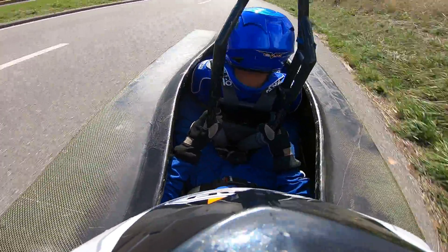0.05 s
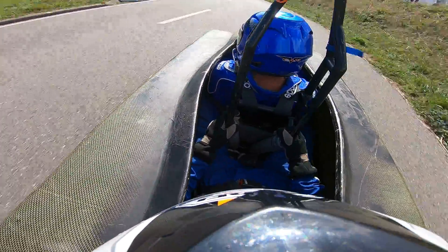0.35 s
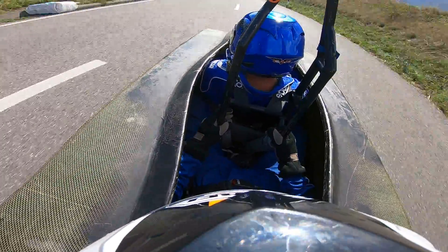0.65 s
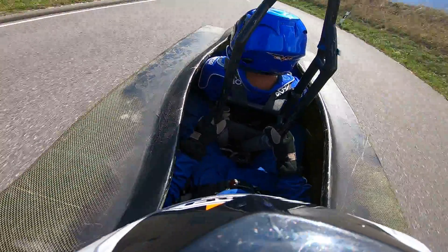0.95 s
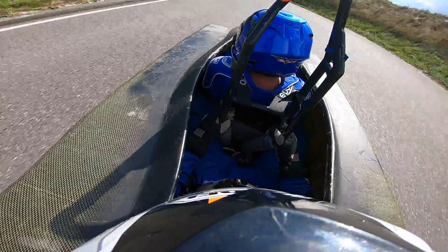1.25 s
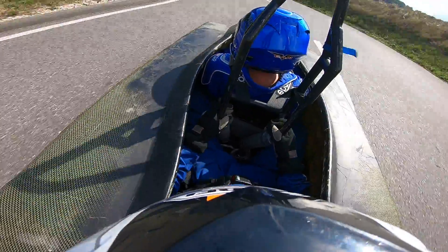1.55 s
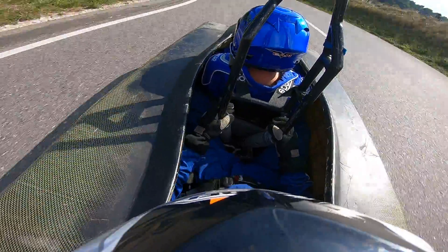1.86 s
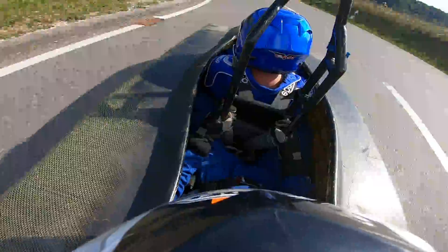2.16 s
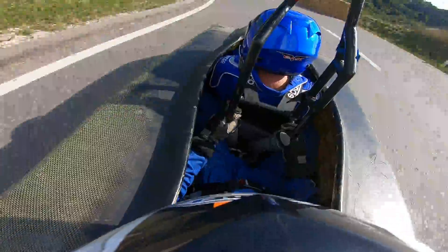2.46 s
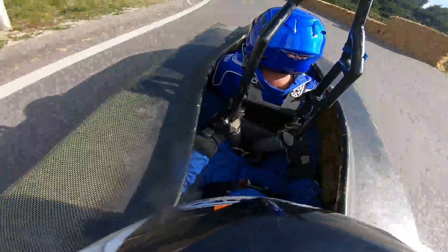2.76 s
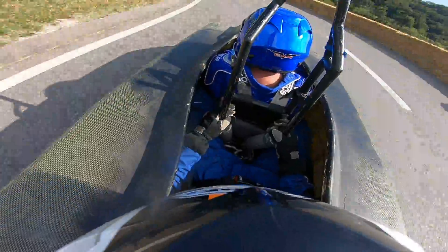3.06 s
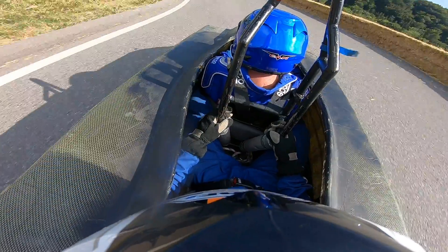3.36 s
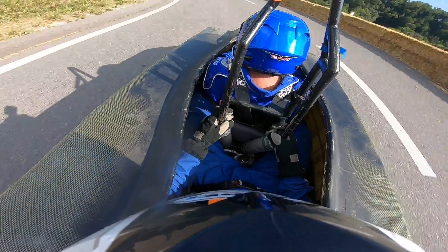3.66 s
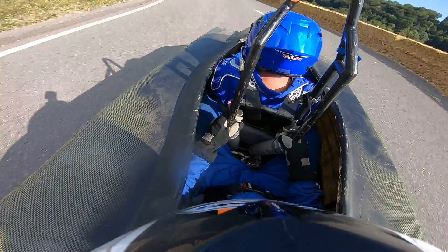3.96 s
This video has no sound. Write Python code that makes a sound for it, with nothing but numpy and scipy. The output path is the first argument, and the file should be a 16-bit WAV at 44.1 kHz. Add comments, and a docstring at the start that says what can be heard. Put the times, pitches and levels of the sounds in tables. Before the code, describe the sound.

Gusty wind buffets an onboard microphone, rushing, hissing and slapping without a break. Underneath, a soapbox's wheels rumble over rough asphalt, making its hollow shell boom, and a loose part rattles faintly and ticks on bumps.

```python
"""Wind throbs and rushes over the drumming of wheels: a soapbox rolls fast down a paved road,
heard from a camera on its shell. Turbulence buffets the microphone, tears past in short eddies,
slaps and hisses in gusts. The rough asphalt drives the resonances of the hollow body through
the wheels, and a loose part chatters throughout and knocks on the bumps."""
import sys
import numpy as np
from scipy import signal
from scipy.fft import rfft, irfft
from scipy.io import wavfile
from scipy.ndimage import uniform_filter1d, minimum_filter1d

SR = 44100
rng = np.random.default_rng(int(sys.argv[2]) if len(sys.argv) > 2 else 0)


def output_pcm(signal):
    """Save a mono or channel-first signal as 16-bit PCM at the path in sys.argv[1].

    Samples are clipped to [-1, 1] before scaling.
    """
    pcm = np.clip(np.atleast_2d(signal).T, -1, 1) * 32767
    wavfile.write(sys.argv[1], SR, np.round(pcm).astype(np.int16))


N = 176400

# Envelopes. Each row: time in seconds, relative level in dB.
BUFFET_LEVELS = [(0, -27), (.09, -16.5), (.23, -24), (.42, -17.5), (.55, -20.5), (.66, -18), (.97, -23),
                 (1.25, -23), (1.34, -15), (1.5, -18.5), (1.8, -15.5), (1.9, -20), (2.04, -29),
                 (2.2, -22.5), (3.2, -19.5), (3.3, -24), (3.45, -20.5), (3.55, -16.5), (3.81, -15),
                 (3.9, -23), (4, -18.5)]  # wind pressure on the microphone
BOOM_LEVELS = [(0, -26), (.09, -20.5), (.2, -25), (.35, -20), (.46, -31), (.64, -26), (.81, -16.5),
               (.98, -29), (1.06, -14.5), (1.14, -21.5), (1.6, -21), (1.66, -32), (1.72, -18),
               (1.83, -27.5), (2.08, -21), (2.21, -18.5), (2.42, -23), (2.65, -20), (2.93, -22),
               (3.0, -16.5), (3.15, -20.5), (3.38, -21.5), (3.5, -19), (3.86, -29), (4, -21)]  # the shell's low resonance
DRUM_LEVELS = [(0, -19), (.09, -23), (.16, -22.5), (.37, -24), (.43, -26), (.53, -20.5), (.62, -29),
               (.7, -18), (.79, -24.5), (.9, -22), (1.13, -24), (1.3, -21), (1.39, -19.5), (1.45, -23.5),
               (1.72, -21.5), (1.8, -22.5), (2.08, -22.5), (2.13, -21), (2.21, -17.5), (2.39, -23.5),
               (2.47, -21), (2.95, -21), (3.09, -26), (3.16, -20), (3.4, -20.5), (3.83, -23.5),
               (3.98, -17.5)]  # the shell's higher resonance
RUSH_LEVELS = [(0, -28.5), (.12, -25.5), (.19, -25), (.33, -29.5), (.46, -25), (.55, -27.5), (.62, -28),
               (.68, -26.5), (.76, -23.5), (.84, -26.5), (.93, -29), (1.0, -28), (1.05, -27.5),
               (1.12, -22.5), (1.27, -28.5), (1.37, -24), (1.44, -29.5), (1.57, -23.5), (1.8, -27),
               (1.95, -28.5), (2.15, -25), (2.35, -27), (2.57, -25), (2.8, -25.5), (2.97, -29.5),
               (3.05, -31), (3.17, -25.5), (3.24, -29.5), (3.4, -26), (3.53, -26.5), (3.65, -27),
               (3.68, -24), (3.8, -25.5), (4, -26)]  # air tearing past
GUST_LEVELS = [(0, -46.5), (.08, -43.5), (.14, -48), (.19, -43), (.26, -42.5), (.3, -39), (.5, -39),
               (.66, -40), (.74, -46.5), (.84, -44), (.92, -37.5), (1.02, -40), (1.045, -51), (1.08, -42),
               (1.24, -40.5), (1.285, -35), (1.315, -48), (1.35, -37.5), (1.44, -37.5), (1.53, -35.5),
               (1.58, -38.5), (1.645, -46), (1.68, -40), (1.82, -37.5), (1.87, -36), (1.93, -40.5),
               (2.13, -38), (2.22, -45), (2.31, -36), (2.37, -38), (2.44, -36.5), (2.56, -40.5),
               (2.66, -39), (2.72, -46.5), (2.8, -43.5), (2.9, -39), (3.32, -38.5), (3.48, -44.5),
               (3.62, -49.5), (3.8, -46), (3.95, -43.5), (4, -47.5)]  # gusts of hiss

# Noise spectra. Each row: frequency in Hz, relative spectral density in dB.
BUFFET_SPECTRUM = [(25, -30.5), (50, -16), (66, -4), (80, -2.5), (97, -1.5), (115, -8.5), (150, -22),
                   (500, -59.5), (5000, -100)]
RUMBLE_SPECTRUM = [(8, -16.5), (22, -3.5), (30, -5), (42, 1.5), (55, 0), (80, -5.5), (500, -62.5),
                   (5000, -100)]
BOOM_SPECTRUM = [(70, -37.5), (110, -4), (130, -0.5), (175, -1), (200, -16.5), (300, -33.5), (3000, -91)]
DRUM_SPECTRUM = [(120, -28), (175, -10), (205, -1), (250, -5), (310, -6.5), (380, -12.5), (500, -20),
                 (900, -28.5), (2500, -66), (9000, -100)]
RUSH_SPECTRUM = [(20, -34), (150, -19), (400, 1.5), (700, -2.5), (1150, -4.5), (1800, -11.5), (2300, -20),
                 (3000, -36.5), (5000, -34), (7000, -61.5), (10000, -93.5)]
HISS_SPECTRUM = [(600, -10.5), (1500, 6.5), (2300, 6.5), (3100, -1.5), (4000, -8.5), (4900, -11.5),
                 (5750, -15.5), (6400, -24.5), (7000, -35), (8200, -38), (10000, -65.5)]
SIZZLE_SPECTRUM = [(2000, -24.5), (3600, 7), (4800, -1.5), (5700, -2.5), (6400, -10), (7100, -19),
                   (8300, -24.5), (10000, -45.5)]
SLAP_SPECTRUM = [(100, -15.5), (450, 4.5), (1000, -0.5), (1700, -2), (2300, -19.5), (3200, -29.5),
                 (5500, -36.5), (9000, -75)]

# Filters. Each row: frequency in Hz, gain in dB.
RUSH_TREBLE_FILTER = [(600, -31.5), (1000, -6), (1500, -0.5)]  # the band of the rush that gusts brighten
RATTLE_FILTER = [(1500, -19), (3300, -13.5), (3800, 0.5), (5000, 0.5), (6000, -6), (7500, -15.5),
                 (10000, -35.5)]  # overall tone of the rattle

# Modes of the loose part. Each row: frequency in Hz, relative level in dB.
PART_MODES = [(3830, -1.5), (4050, 0), (4280, 3), (4480, -5), (4680, -1), (4980, -7)]

# Single events. Each row: start in seconds, relative level in dB.
LOUD_KNOCKS = [(0.186, -29.5), (.235, -34), (.365, -36.5), (0.42, -33), (.457, -32), (0.465, -28),
               (.578, -30), (0.732, -31.5), (0.768, -32), (1.085, -30.5), (1.258, -31), (1.296, -31),
               (1.619, -31.5), (1.662, -29.5), (2.167, -29.5), (2.232, -32.5), (2.261, -30), (2.273, -32.5),
               (2.708, -29.5), (2.784, -25), (3.426, -29), (3.464, -36), (3.475, -33.5), (3.568, -32),
               (3.655, -31.5), (3.686, -36), (3.698, -31), (3.712, -33), (3.742, -33.5), (3.816, -35),
               (3.834, -32.5)]  # the loose part on bumps
STRONG_SLAPS = [(.709, -13), (0.733, -22), (1.024, -9), (1.078, -16.5), (1.381, -25), (1.9, -12),
                (1.993, -16), (2.167, -17), (2.558, -11), (2.744, -11), (2.974, -15.5), (3.386, -13),
                (3.595, -8)]  # hard eddies on the camera


def undb(db):
    """Amplitude ratio of a level in decibels."""
    return 10 ** (np.asarray(db) / 20)


def unit(x):
    """Normalisation to rms 1."""
    return x / np.sqrt(np.mean(x ** 2))


def envelope(rows):
    """Gain over time, interpolated between (s, dB) rows."""
    s, db = np.array(rows).T
    return undb(np.interp(np.arange(N) / SR, s, db))


def shape(x, response):
    """Zero-phase filtering by (Hz, dB) rows, joined on a logarithmic frequency axis."""
    hz, db = np.array(response).T
    f = np.maximum(np.arange(N // 2 + 1) * SR / N, 1)
    return irfft(rfft(x) * undb(np.interp(np.log(f), np.log(hz), db)), N)


def noise(spectrum):
    """Gaussian noise of rms 1, coloured by (Hz, dB) rows."""
    return unit(shape(rng.standard_normal(N), spectrum))


def wander(hz):
    """Random motion of rms 1: low-pass noise with its corner at hz."""
    f = np.arange(N // 2 + 1) * SR / N
    return unit(irfft(rfft(rng.standard_normal(N)) * (f > 2) / (1 + (f / hz) ** 2), N))


def flutter(motion, depth_db):
    """Amplitude modulation: a gain of rms 1 that follows a motion, with deep lulls and rounded crests."""
    rounded = np.where(motion > 0, 1.26 * np.tanh(motion / 2.0), motion)
    return unit(undb(depth_db * rounded))


def steady(x, span_s):
    """Division by the running rms evens out swells longer than span_s."""
    size = max(int(span_s * SR), 2)
    return x / np.sqrt(uniform_filter1d(uniform_filter1d(x ** 2, size), size))


def pulse(t, rise_s):
    """Transient envelope that peaks at 1 after rise_s and decays."""
    u = np.maximum(t, 0) / rise_s
    return u * np.exp(1 - u)


def scatter(count, db, spread_db):
    """Jittered events as (s, dB) rows, with levels within spread_db of db."""
    jitter, size = rng.uniform(-1, 1, (count, 2)).T
    starts = (np.arange(count) + 1 + jitter) * N / SR / (count + 1)
    return np.column_stack([starts, db + spread_db * size])


def wind_buffet():
    """Pressure fluctuations of the wind throb on the microphone, over a steady deep rumble."""
    throb = steady(noise(BUFFET_SPECTRUM), span_s=0.086) * envelope(BUFFET_LEVELS)
    rumble = steady(noise(RUMBLE_SPECTRUM), span_s=0.2)
    return throb + rumble * undb(-23.5)


def rolling_wheels(eddies):
    """Forced vibration: asphalt grain drives two broad shell resonances; eddies shake the upper one."""
    boom = steady(noise(BOOM_SPECTRUM), span_s=0.12) * envelope(BOOM_LEVELS)
    drum = noise(DRUM_SPECTRUM) * flutter(eddies, depth_db=1.0)
    drum = steady(drum, span_s=0.093) * envelope(DRUM_LEVELS)
    return boom * undb(0.5) + drum * undb(1.5)


def air_rush(eddies):
    """Turbulent flow: each passing eddy is a brief burst of noise, brighter in gusts, duller in lulls."""
    air = steady(noise(RUSH_SPECTRUM) * flutter(eddies, depth_db=4.0), span_s=0.06)
    treble_gain = unit(envelope(GUST_LEVELS)) ** 0.5
    air = air + shape(air, RUSH_TREBLE_FILTER) * (treble_gain - 1)
    return air * envelope(RUSH_LEVELS) * undb(2)


def gust_hiss(eddies):
    """Fine-scale turbulence hisses in gusts and flickers partly with the eddies; its top sputters."""
    gust = envelope(GUST_LEVELS)
    flicker = unit(eddies + 2.4 * wander(hz=160))
    hiss = steady(noise(HISS_SPECTRUM) * flutter(flicker, depth_db=4.0), span_s=0.065)
    sizzle = noise(SIZZLE_SPECTRUM) * flutter(wander(hz=110), depth_db=6.5)
    sizzle = steady(sizzle, span_s=0.17) * unit(gust) ** -0.12  # swings a little less than the gusts
    return (hiss * undb(5.5) + sizzle * undb(-7.5)) * gust


def loose_part_rattle(t60_s=0.013, contact_s=0.0011, bounce_s=0.005):
    """Impacts excite a loose part's damped modes; each gritty contact bounces once and rings its own way."""
    t = np.arange(SR // 16) / SR
    mode_hz, mode_db = np.array(PART_MODES).T
    contact = pulse(t, contact_s) + undb(-7) * pulse(t - bounce_s, contact_s)
    decay = np.exp(-np.log(1000) * t / t60_s)
    knocks = np.array(LOUD_KNOCKS) + [0, -4.5]
    chatter = scatter(count=200, db=-44, spread_db=2.5)
    out = np.zeros(N + len(t))
    for s, db in np.vstack([knocks, chatter]):
        detune, weight = rng.standard_normal((2, len(PART_MODES)))
        modes = np.sin(2 * np.pi * np.outer(t, mode_hz * (1 + 0.035 * detune)))
        ring = modes @ undb(mode_db + 3 * weight) * decay
        force = rng.standard_normal(len(t)) * contact
        tick = signal.fftconvolve(force, ring)[:len(t)]
        start = int(s * SR)
        out[start:start + len(t)] += 2 * undb(db) * tick / np.abs(tick).max()
    return shape(out[:N], RATTLE_FILTER)


def air_slaps(rise_s=0.0014):
    """Hard eddies slap the camera as pulses of incoherent noise, which add in power."""
    t = np.arange(SR // 16) / SR
    strong = np.array(STRONG_SLAPS) + [0, -4]
    small = scatter(count=150, db=-24.5, spread_db=6.5)
    power = np.zeros(N + len(t))
    for s, db in np.vstack([strong, small]):
        start = int(s * SR)
        power[start:start + len(t)] += (undb(db) * pulse(t, rise_s)) ** 2
    air = steady(noise(SLAP_SPECTRUM), span_s=0.002)
    wind_strength = unit(envelope(RUSH_LEVELS) * envelope(GUST_LEVELS) ** 0.35)
    return air * np.sqrt(power[:N]) * wind_strength


def scene():
    """Superposition of all sources; one stream of eddies modulates the drumming, rush and hiss."""
    eddies = unit(wander(hz=260) + 0.9 * wander(hz=45.5))  # small and large eddies
    continuous = wind_buffet() + rolling_wheels(eddies) + air_rush(eddies) + gust_hiss(eddies)
    return (continuous + air_slaps() + loose_part_rattle())[None]


def record(dry, ceiling=0.79, smooth_samples=400, cutoff_hz=9800):
    """Peak limiting: the camera eases down the highest peaks, then a low-pass filter cuts the top."""
    gain = ceiling / np.maximum(np.abs(dry), ceiling)
    held = minimum_filter1d(gain, 2 * smooth_samples)
    eased = uniform_filter1d(uniform_filter1d(held, smooth_samples), smooth_samples)
    lowpass = signal.ellip(8, 0.2, 70, cutoff_hz, fs=SR, output="sos")
    return signal.sosfilt(lowpass, dry * eased)


dry = scene()
out = record(dry)
output_pcm(out)
```